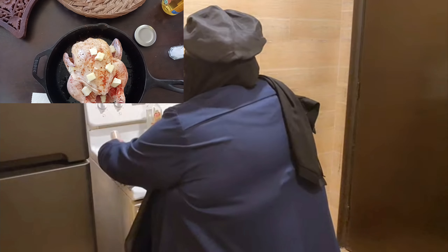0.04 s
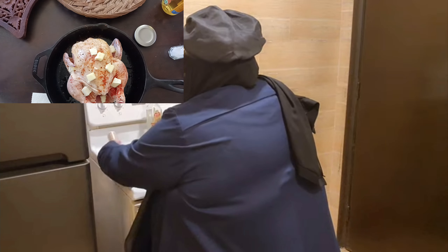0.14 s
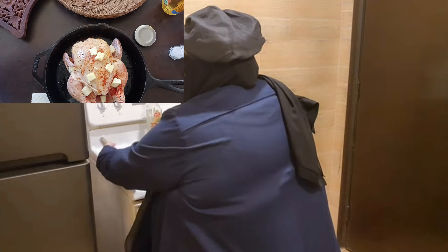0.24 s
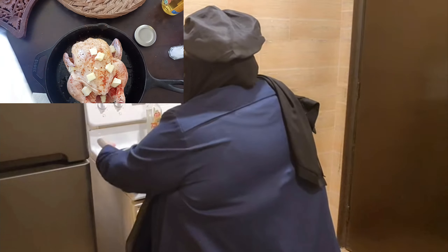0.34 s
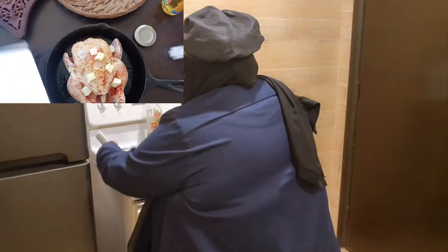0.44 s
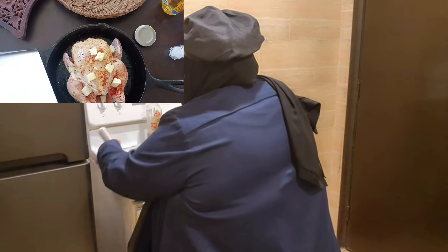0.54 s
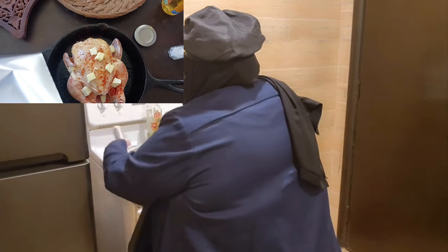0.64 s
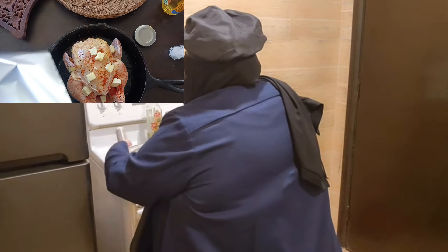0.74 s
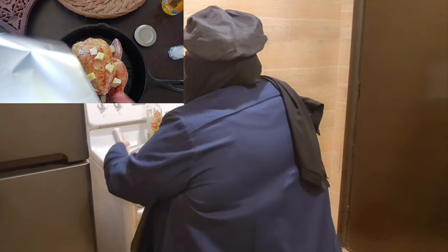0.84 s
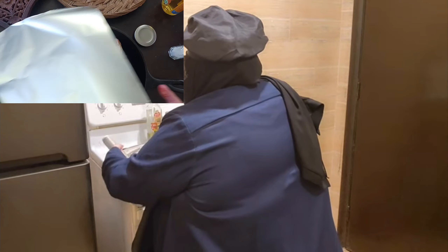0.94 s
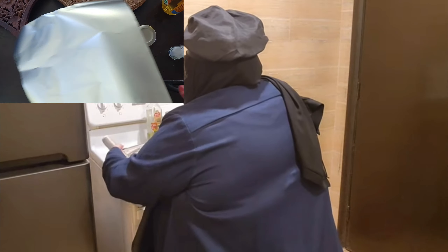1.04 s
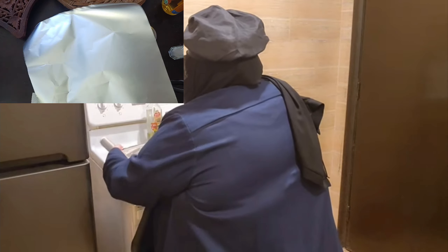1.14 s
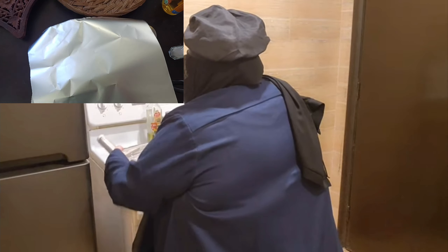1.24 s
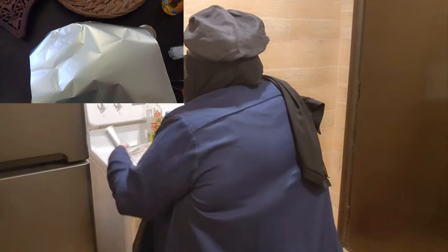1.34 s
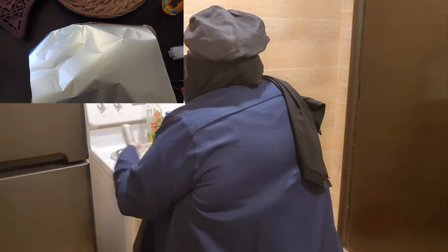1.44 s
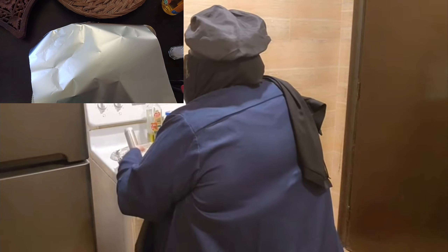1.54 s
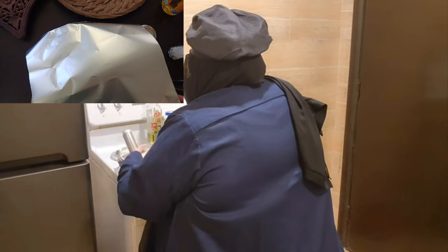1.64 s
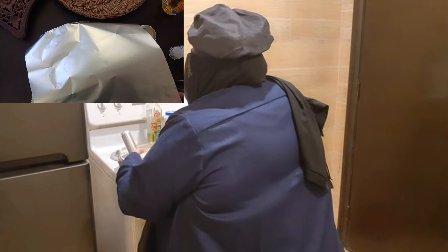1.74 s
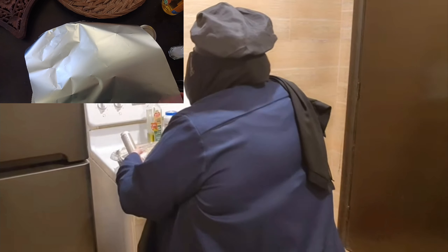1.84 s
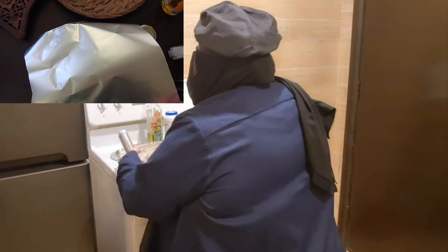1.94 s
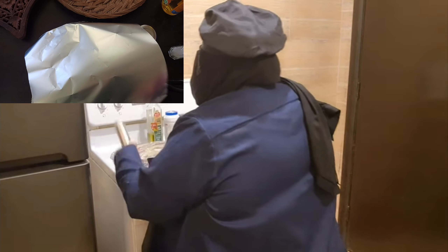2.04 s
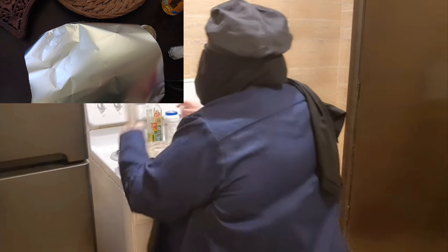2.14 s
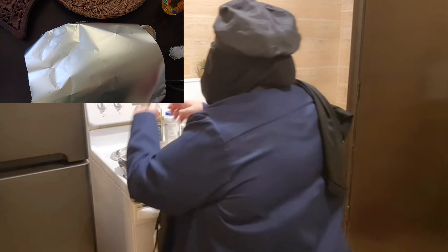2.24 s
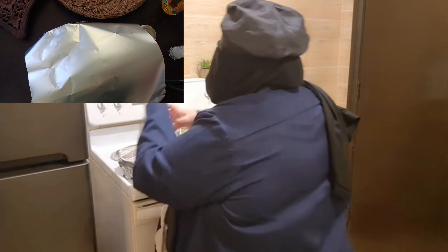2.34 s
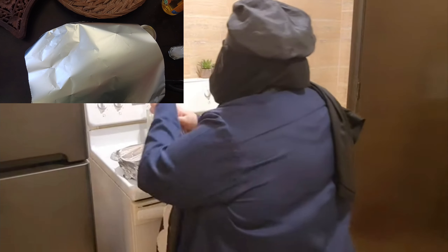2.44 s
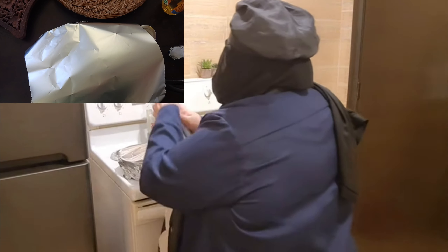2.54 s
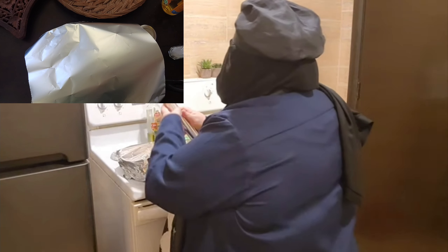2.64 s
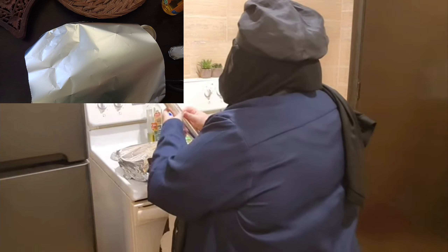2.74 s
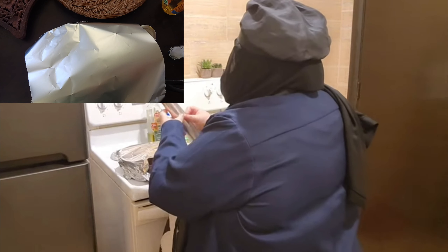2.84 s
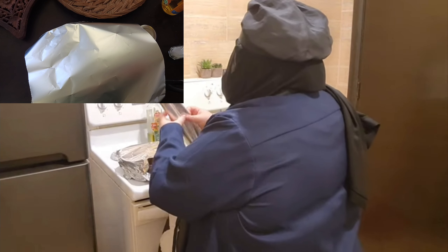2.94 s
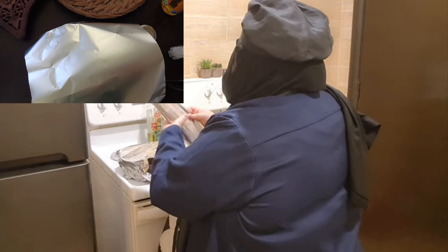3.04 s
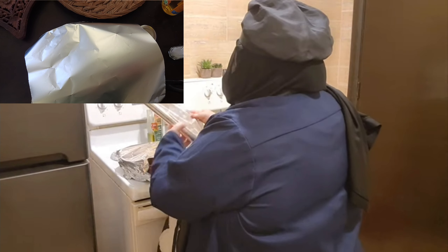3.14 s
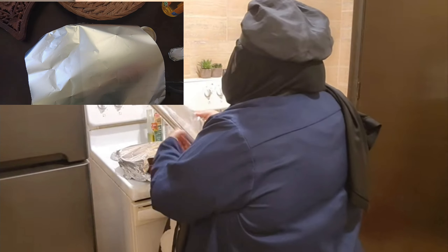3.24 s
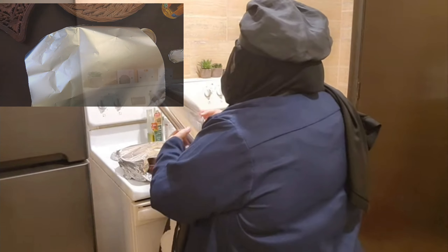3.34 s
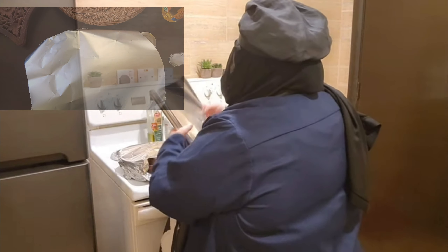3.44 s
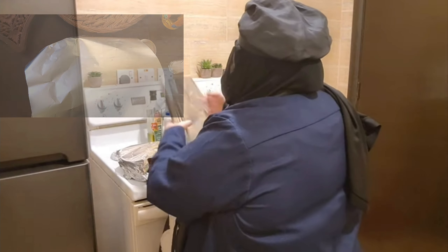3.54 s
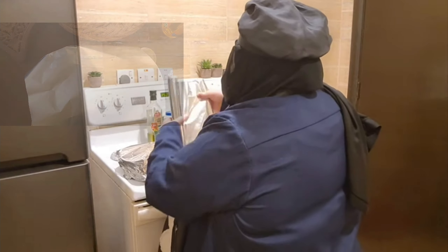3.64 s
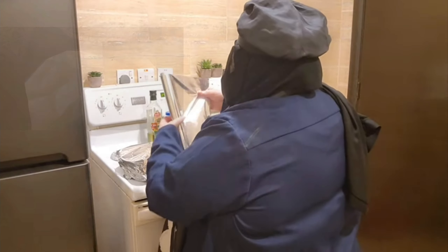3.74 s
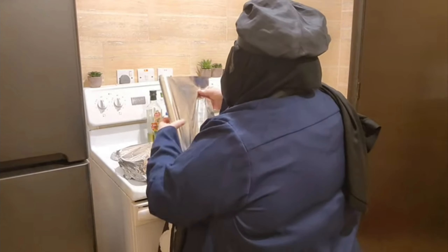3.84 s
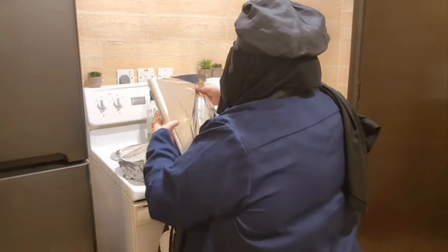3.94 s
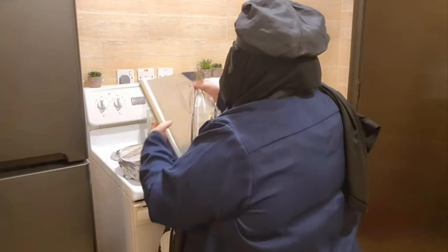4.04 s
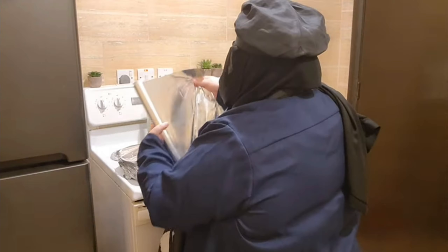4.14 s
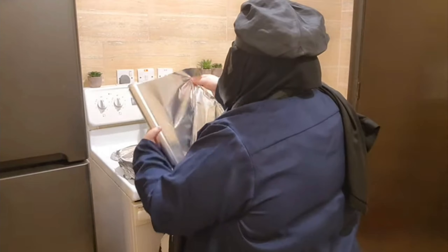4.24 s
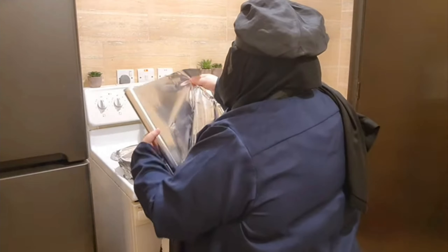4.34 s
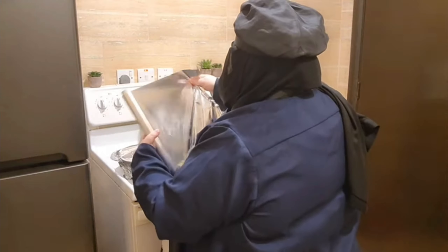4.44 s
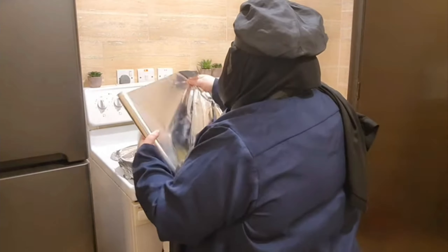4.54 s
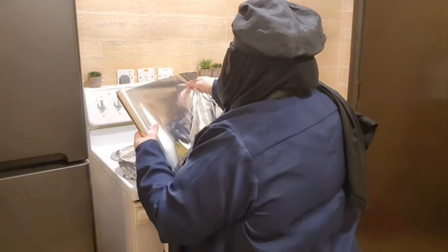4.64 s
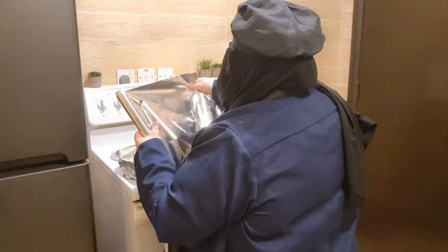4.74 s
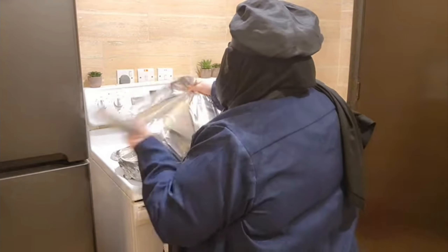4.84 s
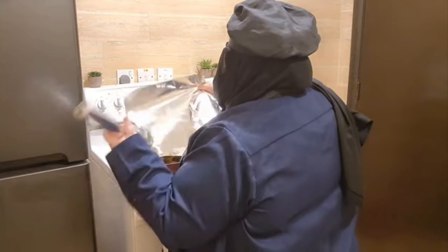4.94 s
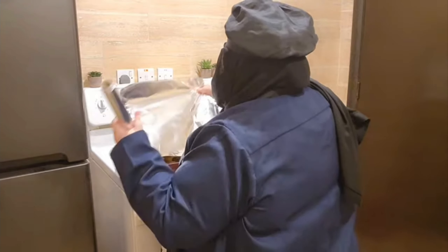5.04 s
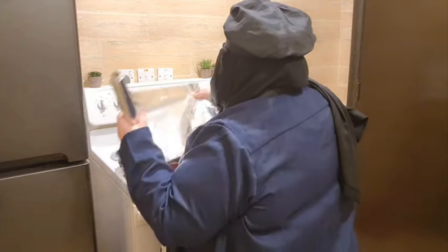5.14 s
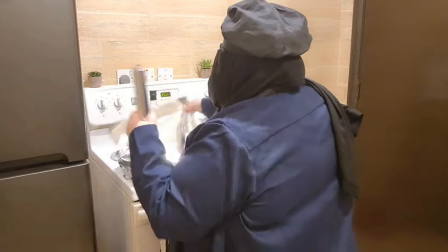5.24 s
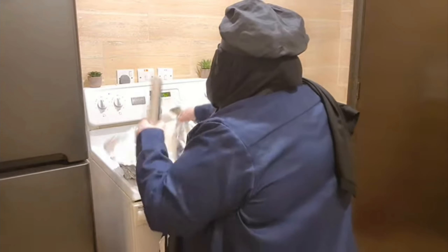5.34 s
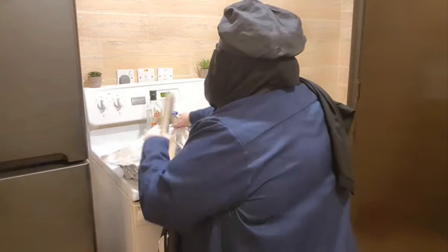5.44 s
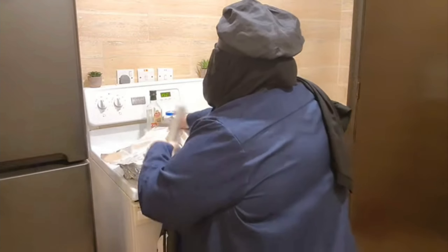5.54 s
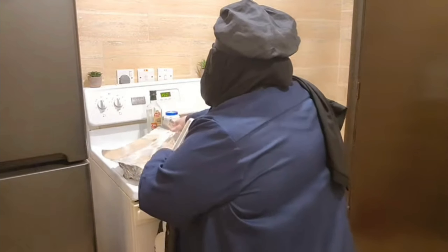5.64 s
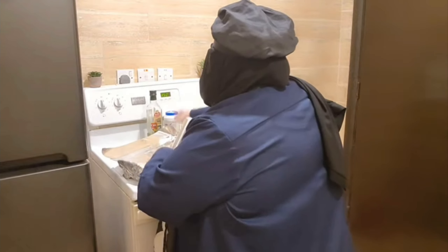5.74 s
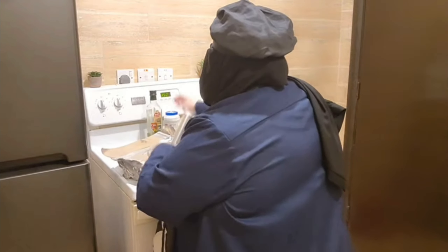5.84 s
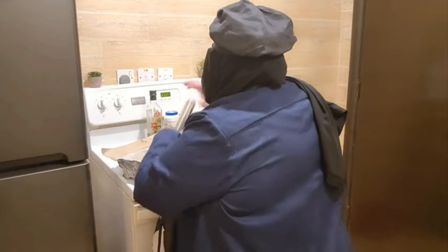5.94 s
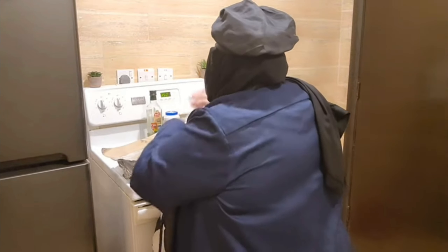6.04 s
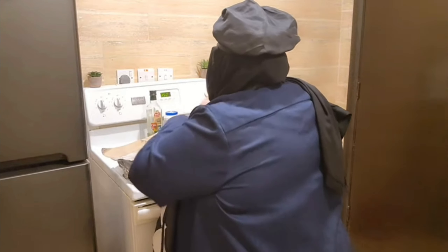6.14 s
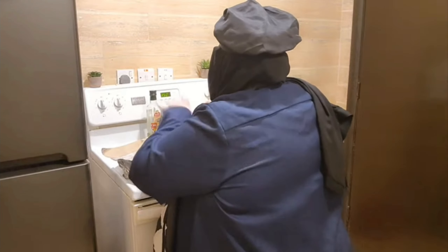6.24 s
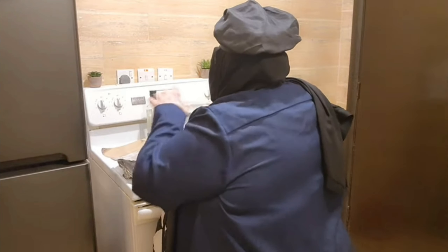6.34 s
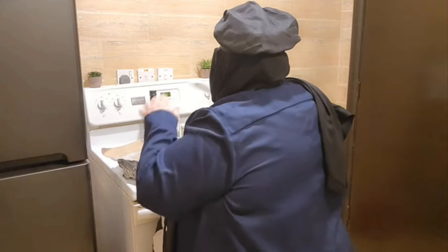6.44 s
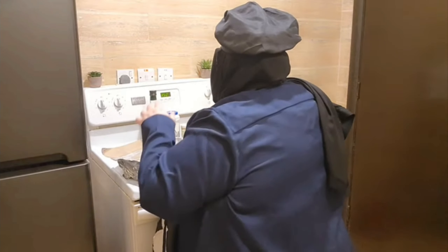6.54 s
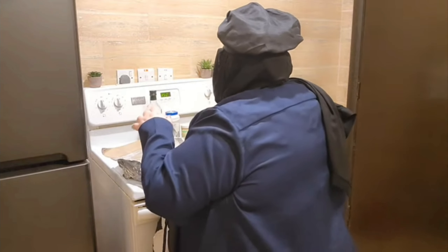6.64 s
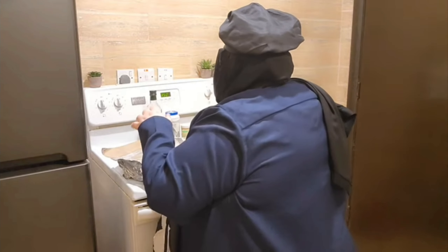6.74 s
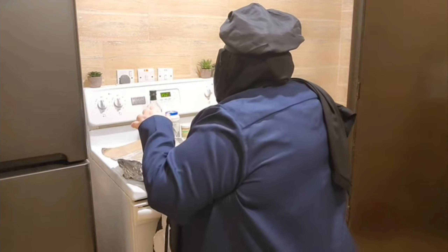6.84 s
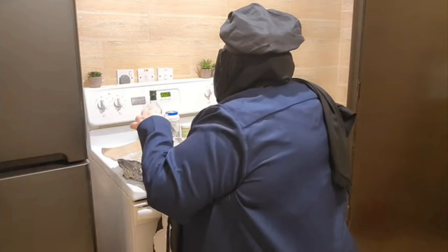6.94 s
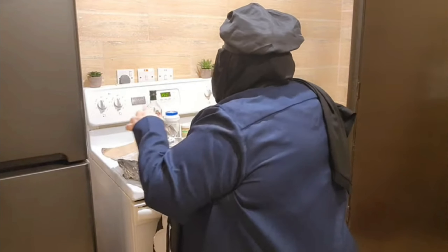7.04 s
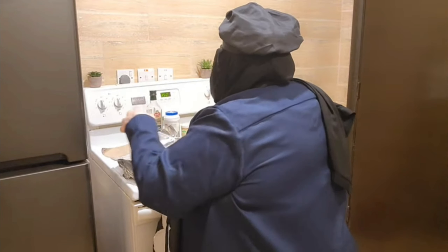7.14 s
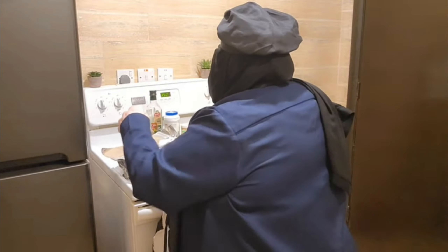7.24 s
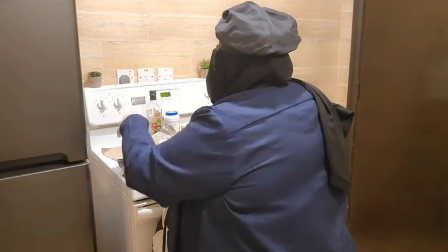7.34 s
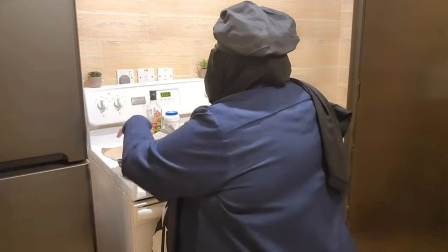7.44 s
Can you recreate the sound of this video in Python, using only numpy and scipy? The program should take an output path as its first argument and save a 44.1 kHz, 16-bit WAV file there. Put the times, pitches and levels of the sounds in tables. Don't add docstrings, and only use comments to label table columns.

```python
import sys
import numpy as np
from scipy import signal
from scipy.fft import rfft, irfft, next_fast_len
from scipy.io import wavfile
from scipy.ndimage import uniform_filter1d

SR = 44100
rng = np.random.default_rng(int(sys.argv[2]) if len(sys.argv) > 2 else 0)


def materialize(psi):
    bounded = np.clip(np.atleast_2d(psi).T, -1, 1)
    quanta = np.round(bounded * 32767).astype(np.int16)
    wavfile.write(sys.argv[1], SR, quanta)


def undo_db(level):
    steps = np.asarray(level, float) / 20
    return 10 ** steps


N = 330750
MONO_FROM_S = 2.53


def evened(x):
    return x / np.sqrt(np.mean(x ** 2) + 1e-20)


def read(points, hz):
    f, value = np.transpose(points)
    return np.interp(np.log(hz + 1), np.log(f + 1), value)


def add(mix, start_s, sound):
    part = mix[round(start_s * SR):][:len(sound)]
    part += sound[:len(part)]


def coloured(x, points):
    hz = np.fft.rfftfreq(len(x), 1 / SR)
    return irfft(rfft(x) * undo_db(read(points, hz)), len(x))


def rung(modes, rattle_s, ring=0.78, tick_db=-34.5):
    t = np.arange(SR // 4) / SR
    u = np.linspace(0, 1, round(rattle_s * SR) + 9)
    body = undo_db(tick_db) * np.exp(-t / .00008)
    for hz, db, t60_s in modes:
        body += undo_db(db - 60 * t / (ring * min(t60_s, .4))) * np.sin(2 * np.pi * hz * t)
    contacts = rng.standard_normal((2, SR // 8)).prod(0)[:len(u)] * u * np.exp(-4 * u)
    out = signal.fftconvolve(body, contacts)
    return out / abs(out).max()


def foil():
    # pitch_hz, density_db (dB per Hz)
    snap_colour = [(180, -37), (300, 3.5), (420, -9), (472, -3), (531, -10), (730, -4.5), (877, -8),
                   (1070, -5), (1230, -7), (1550, -6.5), (13000, -0.5), (15700, -2.5), (16500, -43)]
    level = handling()
    force, pings = buckling()
    clumps = undo_db(2.4 * evened(uniform_filter1d(rng.standard_normal(N), 350)))
    swarm = ranges(coloured(snaps(per_s=5500, spread_db=3.0) * clumps, snap_colour))
    volley = ranges(coloured(snaps(per_s=15000, spread_db=1.0), snap_colour))
    buckle_share = undo_db(np.array([[0.], [-0.2], [-7.], [-13.]]))
    creases = (undo_db(-1.5) * level * swarm + buckle_share * force * volley).sum(0)
    return creases + pings + undo_db(-2.0) * facets(level[2])


def handling():
    # start_s, fizz_db, dullness_db
    effort = [(0.0, -38, 4), (.6, -36, -1.5), (.85, -32, -0.5), (1.12, -43.5, 7), (1.3, -35, -2),
              (1.56, -48, 11.5), (1.8, -31.5, -4), (1.97, -44.5, 4.5), (2.12, -34.5, -4.5),
              (2.4, -73.5, 23), (2.52, -83.5, 8), (2.56, -59.5, -6), (3.05, -55.5, 4), (3.55, -40.5, -4.5),
              (3.8, -32.5, 2), (3.96, -41.5, 2), (4.19, -47, -9), (4.3, -90, 0)]
    # peak_s, fizz_db, rise_s, fall_s, dullness_db
    strokes = [(0.0, -24.5, .05, 0.089, 8), (.12, -21.5, 0.038, 0.039, -10),
               (0.311, -27.5, 0.0097, 0.15, -5), (.53, -17, 0.044, 0.1, -13),
               (0.639, -19.5, 0.057, 0.15, -3), (.88, -27, 0.12, 0.29, -2),
               (1.178, -16.5, 0.038, 0.13, -7.5), (1.37, -26, 0.13, 0.044, -1),
               (1.4, -36.5, 0.025, 0.041, 30), (1.48, -33.5, 0.012, 0.18, 10.5),
               (1.71, -32, 0.13, 0.17, 14.5), (1.87, -25, 0.037, 0.055, -3),
               (2.161, -25.5, 0.044, 0.076, 3),
               (2.55, -58, 0.012, 0.079, 33.5), (2.67, -58, .08, 0.29, 11), (3.11, -49, 0.02, 0.097, 16),
             (3.88, -29, 0.13, 0.12, -27), (3.98, -28, 0.039, 0.076, 5), (4.261, -31.5, 0.059, 0.45, 4.5),
             (4.45, -35.5, 0.035, 0.063, 6), (4.59, -30.5, 0.1, 0.2, 7), (4.89, -35, 0.11, 0.11, 10),
             (4.948, -17.5, 0.037, 0.041, 12.5), (5.07, -26.5, 0.71, 0.2, -2),
             (5.37, -40.5, 0.22, 0.11, 6.5), (5.53, -37.5, 0.025, 0.25, 4), (5.59, -38.5, 0.14, 0.14, 12.5),
             (5.82, -32, 0.11, 0.16, 8.5), (5.96, -40, 0.25, 0.083, 7.5), (6.376, -62, 0.09, 0.11, 3.5),
             (7.06, -54.5, .045, 0.036, 8.5), (7.125, -52, .08, .05, 4), (7.172, -46.5, 0.058, 0.11, -3),
             (7.16, -79, 0.13, 0.13, 48.5), (7.37, -78, 0.24, 0.24, 42), (7.5, -66.5, .012, .02, 17)]
    steady_db = [0, -1.5, -5.5, -10]
    stroke_tone_db = [-1, -4.5, -12, -22.5]
    dull_share = [0, .22, .6, 1.0]
    t = np.arange(0, N / SR + .002, .001)
    share = np.array(dull_share)[:, None]
    s, fizz_db, dull_db = np.transpose(effort)
    steady = np.interp(t, s, fizz_db) + share * np.interp(t, s, dull_db)
    power = undo_db(steady + np.array(steady_db)[:, None]) ** 2
    for peak_s, db, rise_s, fall_s, dullness_db in strokes:
        before = (np.maximum(peak_s - t, 0) / rise_s) ** 1.4
        after = (np.maximum(t - peak_s, 0) / fall_s) ** 1.026
        stroke = db - 19.5 * (before + after)
        power += undo_db(stroke + share * dullness_db + np.array(stroke_tone_db)[:, None]) ** 2
    return np.array([np.interp(np.arange(N) / SR + .01, t, np.sqrt(p)) for p in power])


def snaps(per_s, spread_db):
    size = undo_db(spread_db * np.minimum(rng.exponential(1, N), 3.5))
    return evened(size * rng.standard_normal(N) * (rng.random(N) < per_s / SR))


def ranges(x):
    bands = []
    for edges_hz in [(6000, 19000), (2800, 6000), (1300, 2800), (400, 1300)]:
        sos = signal.butter(3, edges_hz, "band", fs=SR, output="sos")
        bands.append(evened(signal.sosfilt(sos, x)))
    return np.array(bands)


def buckling():
    # start_s, peak_db, ping_hz, ping_db (re peak)
    buckles = [(0.055, -15, 1370, -15.5), (.103, -18, 5490, -20), (0.303, -19, 4470, -16),
               (.4239, -28, 4640, -7), (0.49, -11, 4170, -19), (0.629, -15, 5230, -7),
               (1.139, -22, 4140, -3), (1.1684, -19, 3800, -17.5), (1.323, -16, 2820, -6.5),
               (1.3947, -13, 1840, -21), (1.483, -13.5, 2490, -31), (1.627, -13.5, 1780, -25),
               (1.6995, -14, 2020, -13), (1.7604, -29, 3350, -17), (1.8682, -30, 3340, -15),
               (2.0696, -15, 2270, -16), (2.152, -25, 5900, -16),
               (2.547, -34, 1350, -6), (2.663, -34, 2620, -4), (2.8738, -33.5, 3900, -19),
                    (3.0164, -25, 4020, -16), (3.0967, -32.5, 4060, -4.5), (3.1407, -27, 2300, -17),
                    (3.2421, -26.5, 2340, -14), (3.3722, -24.5, 4050, -17), (3.5039, -22, 2060, -14),
                    (3.58, -20, 3860, -7.5), (3.674, -16, 3210, -16), (3.7777, -21, 1586, -9),
                    (3.859, -15, 4060, -14), (3.9705, -9.5, 2250, -27), (4.2068, -34, 3250, -5),
                    (4.246, -21, 5530, -16), (4.532, -19, 4130, -13.5), (4.8204, -19, 5500, -20.5),
                    (4.8544, -22, 4630, -7), (4.9254, -2.5, 1850, -10), (5.4999, -25.5, 2060, -7.5),
                    (5.7389, -26, 3560, -10), (5.7983, -23, 3370, -7), (7.0459, -42, 3830, -11),
                    (7.15, -40, 1390, -18)]
    force, pings = np.zeros(N), np.zeros(N)
    t = np.arange(SR // 2) / SR
    t60_s, rise_s = 0.078, 0.0041
    for s, db, hz, ping_db in buckles:
        add(force, s, undo_db(db - 13.0 - 60 * t / t60_s) * np.minimum(t / rise_s, 1))
        panel = rung([(hz, 0, .045), (hz * 1.57, -15, .03)], 0.01)
        add(pings, s, undo_db(db + ping_db - 1.0) * panel)
    return force, pings


def facets(level, per_s=60, low_hz=900, top_hz=7000, cycles=45):
    out, t, count = np.zeros(N), np.arange(SR // 12) / SR, 400
    for place, pitch, size in rng.random((count, 3)):
        hz = low_hz * (top_hz / low_hz) ** pitch
        fade = np.exp(-t * (hz / cycles + 40)) * np.minimum(t / 0.0016, 1)
        add(out, place * count / per_s, undo_db(-14 * size) * np.sin(2 * np.pi * hz * t) * fade)
    return out * level


def panels():
    # start_s, pitch_hz,
    # peak_db, t60_s
    taut_panels = [(.56, 2010, -35, 0.17), (.672, 1060, -29.5, 0.21), (.755, 2230, -36, 0.088),
                   (1.62, 1450, -29.5, 0.1), (1.705, 2030, -48, 0.079), (2.548, 2024, -42, .15),
                   (2.55, 1020, -40, 0.069), (2.552, 1390, -50, 0.11), (2.552, 5430, -52, .1),
                   (2.66, 2600, -45, .12), (2.71, 2630, -48, 0.13), (2.948, 2220, -45, .11),
                   (2.888, 3910, -52, 0.051), (2.89, 1550, -48, 0.11), (3.018, 4000, -46, .06),
                   (3.017, 1500, -39, .05), (3.097, 4030, -39, .07), (3.116, 4100, -44, .04),
                   (3.118, 2300, -42, .06), (3.137, 2320, -42, .06), (3.15, 2570, -40, 0.069),
                   (3.172, 1510, -45, .08), (3.245, 4570, -49, 0.052), (3.272, 1600, -44, .06),
                   (.742, 1150, -30, .1), (2.148, 1800, -36, 0.11), (2.152, 2200, -33, .1),
                   (4.913, 1100, -19, 0.085), (3.1, 2370, -44, 0.22), (3.145, 960, -43, 0.12),
                   (3.24, 2350, -47, .12), (3.39, 2330, -42, .1), (3.815, 4050, -32, 0.11),
                   (3.82, 2250, -30, 0.15), (3.89, 2250, -27.5, 0.097), (3.975, 4380, -42, 0.092),
                   (4.3, 2216, -34.5, 0.2), (7.32, 3710, -63, .08), (7.33, 1380, -47, 0.074),
                   (7.41, 1440, -48.5, 0.14)]
    out = np.zeros(N)
    for s, hz, db, t60_s in taut_panels:
        modes = [(hz, 0, t60_s / 2), (hz * 0.88, -13, t60_s / 2)]
        add(out, s, undo_db(db) * rung(modes, min(.12 * t60_s, 1 / 9)))
    return out


def ticks(t60_s=.015, trim_db=-2.0):
    # start_s, peak_db
    lone_snaps = [(0.496, -11), (1.1324, -24), (1.1416, -13), (2.5476, -40), (2.6633, -40), (2.8729, -41),
                  (2.8904, -37), (2.9514, -39), (3.0175, -35), (3.0989, -44), (3.1114, -41), (3.1224, -36),
                  (3.1394, -36), (3.1524, -38), (3.2464, -33), (3.2654, -33), (3.2784, -33), (3.3732, -37),
                  (3.5039, -33), (6.7554, -63)]
    out, t = np.zeros(N), np.arange(SR // 20) / SR
    for s, db in lone_snaps:
        burst = np.diff(rng.standard_normal(len(t) + 1)) / 2
        add(out, s, undo_db(db + trim_db - 60 * t / t60_s) * burst)
    return out


def knocks():
    # pitch_hz, level_db, t60_s
    pan_modes = [(98, -17, 0.38), (186, -2.5, 0.3), (278, -3, 0.22), (446, -4.5, 0.11), (593, 0.5, 0.064),
                 (736, 0.5, 0.11), (1060, -19, .15), (1210, -19, .15), (1460, -5.5, 0.097),
                 (1810, -14, 0.1), (2060, -23, .1), (2410, -22, .1)]
    # pitch_hz, level_db, t60_s
    stove_modes = [(105, -18, 0.16), (200.4, -19, .15), (594, -10, 0.12), (1060, -3.5, 0.11),
                   (1250, -13.5, .1), (1570, -3.5, 0.09), (1882, 1.5, 0.086), (2044, -5, .15),
                   (2250, -7, 0.15), (2836, -8, 0.14), (3560, -15.5, .04), (3750, -5.5, 0.092),
                   (4630, -10.5, 0.1), (5500, -2.5, .06)]
    # start_s, level_db, rattle_s
    pan_blows = [
        (1.384, -25, .015),
        (1.392, -19, .02),
        (1.404, -22, 0.022),
        (1.416, -21, 0.018),
        (1.425, -30, 0.019),
    ]
    # start_s, level_db, rattle_s
    stove_blows = [
        (4.92, -16, 0.018),
        (4.936, -22, 0.029),
        (4.95, -21.5, 0.022),
        (4.966, -25, 0.024),
        (4.985, -33, 0.024),
        (5.012, -35.5, 0.018),
    ]
    # start_s,
    # peak_db, ring_hz, t60_s, rattle_s
    bumps = [(0.618, -24, 480, 0.2, 0.014), (.622, -36, 235, .1, 0.0099), (.64, -23, 474, 0.36, 0.0085),
             (0.668, -21, 198, 0.42, 0.023), (.695, -21.5, 207, 0.26, .02), (.712, -27, 730, 0.094, .015),
             (0.719, -23.5, 111, 0.15, 0.016), (.76, -30.5, 95, .15, 0.017),
             (1.462, -18.5, 101, 0.13, 0.014), (1.497, -20.5, 78.5, 0.19, 0.012),
             (4.935, -26, 490, 0.081, 0.022), (4.95, -34, 105, .1, 0.018), (1.619, -32, 72.7, 0.13, 0.03),
             (1.688, -25, 111, 0.12, 0.029), (2.551, -36.5, 72.7, 0.17, 0.031),
             (3.811, -30.5, 1060, 0.12, 0.018), (3.857, -21.5, 160, 0.28, 0.03),
             (3.969, -29, 226, 0.076, 0.017), (4.298, -40, 94.2, 0.11, 0.034),
             (5.799, -41, 108, 0.17, 0.028), (6.75, -43, 203, 0.1, 0.01), (7.085, -43, 710, 0.096, 0.031),
             (7.149, -37, 494, .1, .015), (7.335, -43.5, 713, .07, 0.028), (7.1, -29.5, 91.5, 0.087, 0.031)]
    out = np.zeros(N)
    for s, db, rattle_s in pan_blows:
        add(out, s, undo_db(db + 8) * rung(shifted(pan_modes), rattle_s, .3, 19.))
    for s, db, rattle_s in stove_blows:
        add(out, s, undo_db(db + 8) * rung(shifted(stove_modes), rattle_s, .5, 8.))
    for s, db, hz, t60_s, rattle_s in bumps:
        half_s = t60_s / 2
        modes = [(hz, 0, t60_s), (hz * 1.45, -5, half_s), (hz * 2.6, -11, half_s), (hz * 3.1, -14, half_s)]
        add(out, s, undo_db(db - 3.0) * rung(modes, 1.5 * rattle_s, 0.9))
    return out


def shifted(modes, detune=.025, scatter_db=3.0):
    draws = rng.standard_normal((len(modes), 2))
    return [(hz * (1 + detune * a), db + scatter_db * b, t60_s)
            for (hz, db, t60_s), (a, b) in zip(modes, draws)]


def kitchen(x, direct_db=-5.0, count=5):
    # pitch_hz, t60_s
    room_t60 = [(100, 0.27), (300, 0.32), (1000, 0.29), (4000, 0.35), (9000, 0.29), (15000, 0.14)]
    size, whole = SR // 2, next_fast_len(N + SR)
    taps = np.zeros((2 * count, size))
    at = np.arange(60, size - 12, 12) + rng.integers(0, 12, (2 * count, (size - 61) // 12))
    np.put_along_axis(taps, at, rng.choice([-1., 1.], at.shape), 1)
    hz, t, z = signal.stft(taps, SR, nperseg=256)
    tails = signal.istft(z * undo_db(-60 * t / read(room_t60, hz)[:, None]), SR, nperseg=256)[1]
    tails /= np.linalg.norm(tails, axis=1, keepdims=True)
    tails[np.arange(2 * count), rng.integers(0, 50, 2 * count)] = undo_db(direct_db)
    turn = (np.arange(N) / SR * 60. - np.arange(count)[:, None]) % count - 1
    shares = np.cos(np.pi / 2 * np.clip(turn, -1, 1))
    heard = rfft(shares * x, whole) * rfft(tails, whole).reshape(2, count, -1)
    return irfft(heard.sum(1), whole)[:, :N] / np.linalg.norm(tails[0])


def rumble():
    # pitch_hz, density_db (dB per Hz)
    rumble_colour = [(12, -47.5), (20, -24), (49, -5), (117, -2.5), (161, -11.5), (205, -7), (236, -19.5),
                     (277, -14.5), (447, -23), (604, -24.5), (665, -23.5), (732, -33.5), (900, -42),
                     (1170, -68), (1980, -120)]
    hz, _, z = signal.stft(rng.standard_normal((2, N)), SR, nperseg=2048)
    patches = uniform_filter1d(rng.standard_normal(z.shape[1:]), 4, 0)
    patches = evened(uniform_filter1d(patches, 5, 1))
    z = z * undo_db(read(rumble_colour, hz)[:, None] + 2.0 * patches)
    x = signal.istft(z, SR, nperseg=2048)[1][:, :N]
    t = np.arange(N) / SR
    steady = undo_db(np.interp(t, [MONO_FROM_S - .6, MONO_FROM_S], [-44.5, -47]))
    shake_s, shake_db, shake_t60_s = 1.53, -37, 0.97
    shudder = (t > shake_s) * undo_db(shake_db - 60 * abs(t - shake_s) / shake_t60_s)
    return evened(x) * undo_db(1.0) * np.hypot(steady, shudder)


def hum():
    # pitch_hz, width_hz, level_db
    motor_tones = [(62, 5, -57.5), (108, 8, -58.5), (193.7, 5, -57), (274.3, 12, -63), (445.4, 3.3, -64.5),
                   (479, 8, -72.5), (546.4, 5, -75.5), (678, 25, -71.5), (760, 8, -74.5)]
    hz, z = np.fft.rfftfreq(N, 1 / SR), rfft(rng.standard_normal(N))
    out = np.zeros(N)
    for f, width_hz, db in motor_tones:
        out += undo_db(db) * evened(irfft(z / (1 + (2 * (hz - f) / width_hz) ** 2), N))
    return out


def still_air():
    # pitch_hz, density_db (dB per Hz)
    air_colour = [(600, -23.5), (800, -10), (1100, -11.5), (1500, -17.5), (2300, -22), (2900, -28),
                  (5000, -35), (16000, -56)]
    return undo_db(-64.5) * evened(coloured(rng.standard_normal(N), air_colour))


def microphones(pair):
    # pitch_hz, likeness (0-1)
    likeness = [(60, .998), (130, .996), (290, .995), (640, .98), (1410, 0.67), (3100, 0.06), (6820, 0.13),
                (15000, 0.12)]
    # pitch_hz, factor
    lean_share = [(600, 0.0054), (1400, .15), (3100, 0.32), (6800, 0.46), (12000, 0.98)]
    # start_s, level_db
    lean_course = [
        (0.0, 9),
        (.5, 13.5),
        (.9, 11),
        (1.15, 9.5),
        (1.9, 5.5),
        (2.5, 10),
    ]
    # centre_s, half_length_s
    lulls = [
        (.25, 0.068),
        (1.04, 0.12),
        (1.642, 0.069),
        (2.03, 0.099),
    ]
    # pitch_hz, width_hz, level_db
    capsule = [(1180, 220, -1.5), (1900, 450, 2), (2710, 500, -1.5), (4400, 800, 2), (5900, 1100, -1.5),
               (7500, 340, 0.5), (9970, 580, -3), (11700, 360, 0)]
    hz, t, (a, b) = signal.stft(pair, SR, nperseg=512)
    hz = hz[:, None]
    wide = t < MONO_FROM_S
    lull = sum(np.clip(2 - 2 * abs(t - s) / half_s, 0, 1) for s, half_s in lulls)
    lean_db = wide * np.interp(t, *np.transpose(lean_course)) * (1 - .72 * lull)
    colour_db = sum(db * np.exp(-((hz - f) / width_hz) ** 2) for f, width_hz, db in capsule)
    shine_db = 2.1 * np.exp(-((hz - 15000) / 820) ** 2)
    a, b = undo_db(colour_db + wide * shine_db) * np.array([a, b])
    same = np.clip(read(likeness, hz), .01, 1)
    centring = (hz > 8500) * np.clip(0.91 * lull, 0, 1)
    same = same ** (1 - centring) * wide + ~wide
    right = undo_db(-read(lean_share, hz) * lean_db)
    apart = np.sqrt(abs(1 - same ** 2))
    middle = np.hypot(1 + right * same, right * apart) / 2
    both = np.array([a, right * (same * a + apart * b)]) / middle
    return signal.istft(both, SR, nperseg=512)[1][:, :N]


def scene():
    high_pass = signal.butter(2, 55, "high", fs=SR, output="sos")
    hits = signal.sosfilt(high_pass, knocks()) + panels() + ticks()
    room = kitchen(foil() + undo_db(-3.0) * hits)
    return microphones(room + undo_db(-4.0) * hits + rumble() + hum() + still_air())


def roll_off(x):
    return signal.sosfilt(signal.butter(12, 16780, fs=SR, output="sos"), x)


def record(dry):
    ceiling = .75
    soft = ceiling * np.tanh(dry / ceiling)
    low_pass = signal.firwin(255, 15980, window=("kaiser", 8), fs=SR)
    limited = signal.oaconvolve(soft, low_pass[None], "same")
    return roll_off(limited)


dry = scene()
out = record(dry)
materialize(out)
```